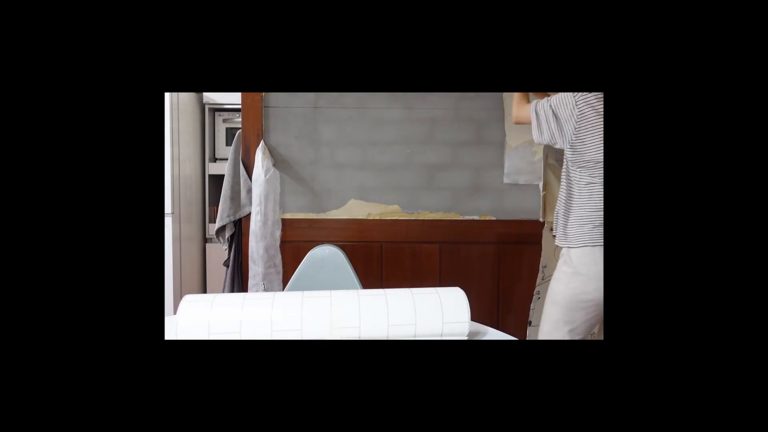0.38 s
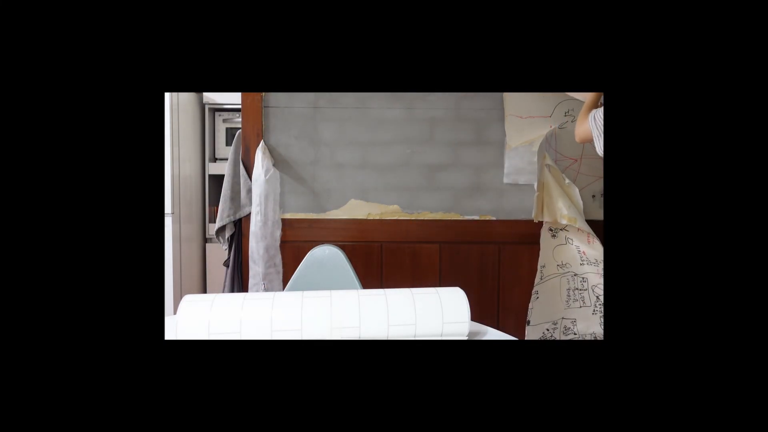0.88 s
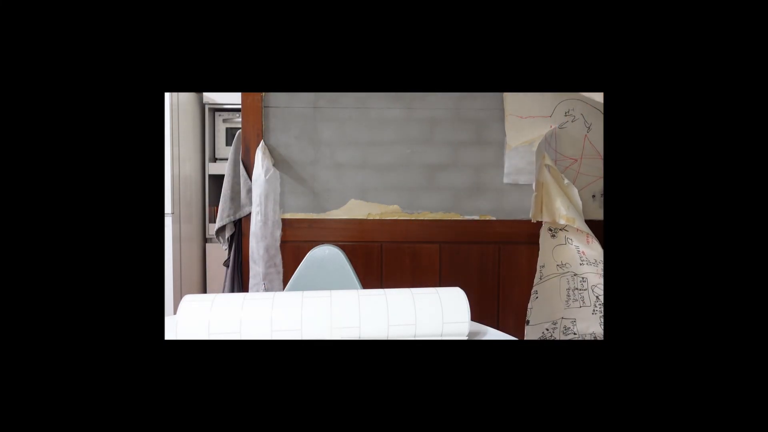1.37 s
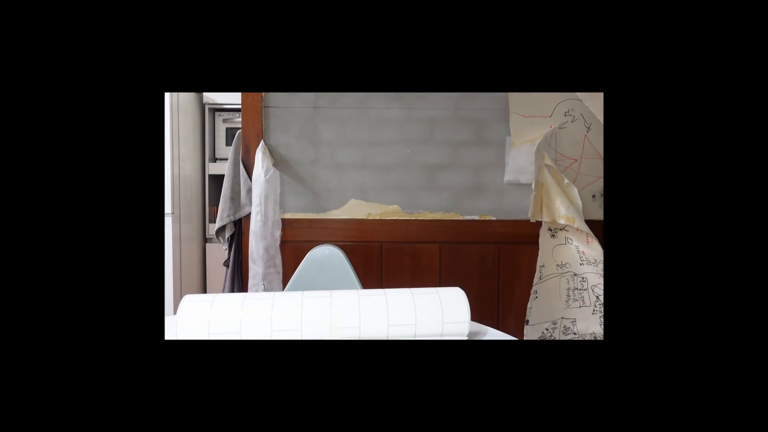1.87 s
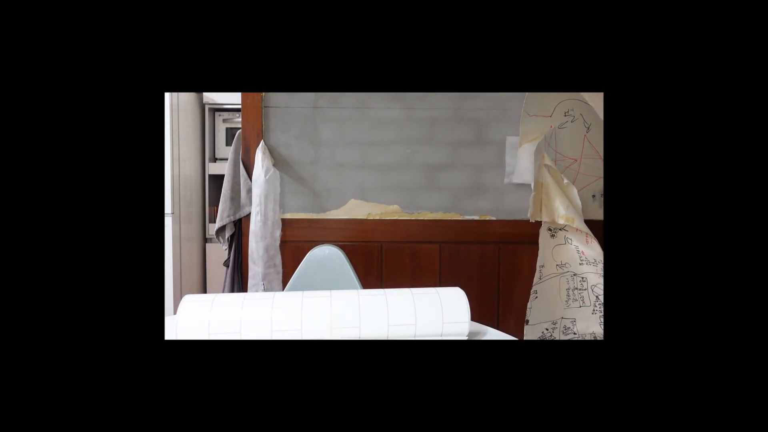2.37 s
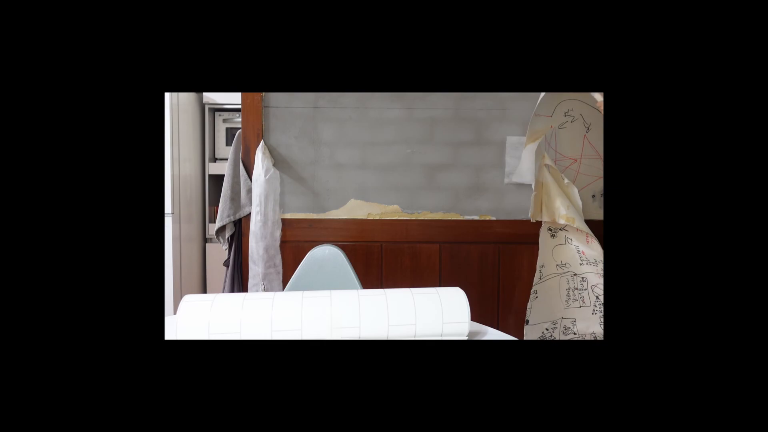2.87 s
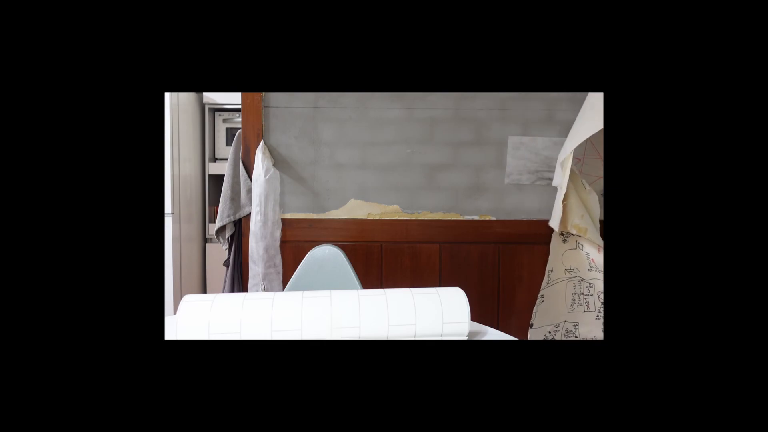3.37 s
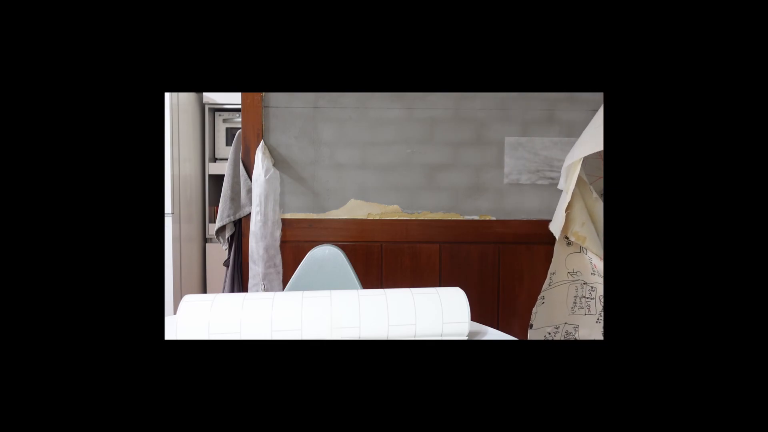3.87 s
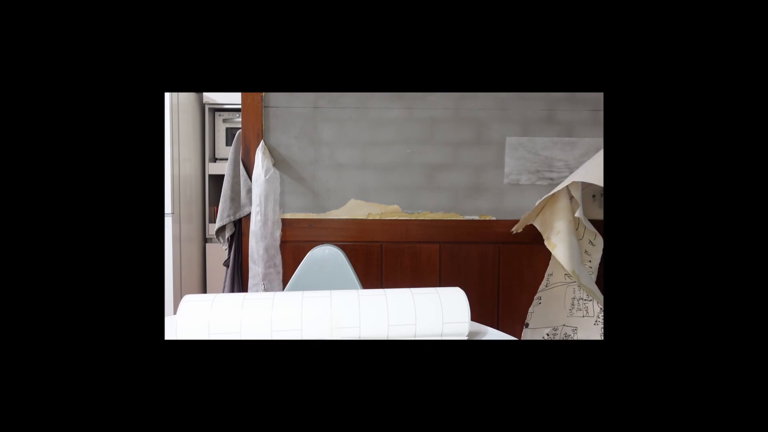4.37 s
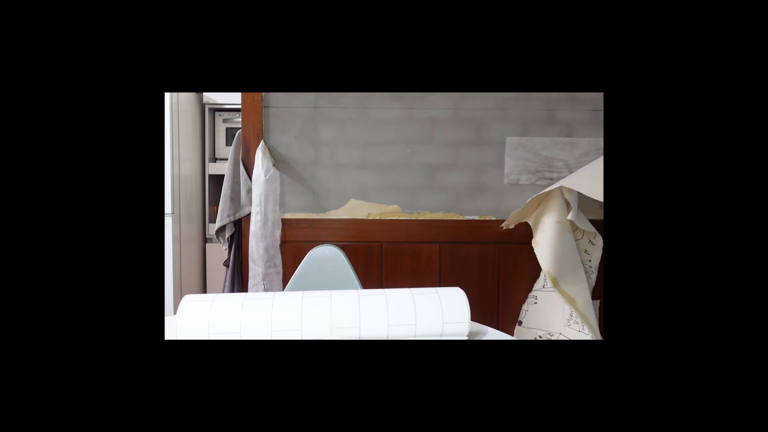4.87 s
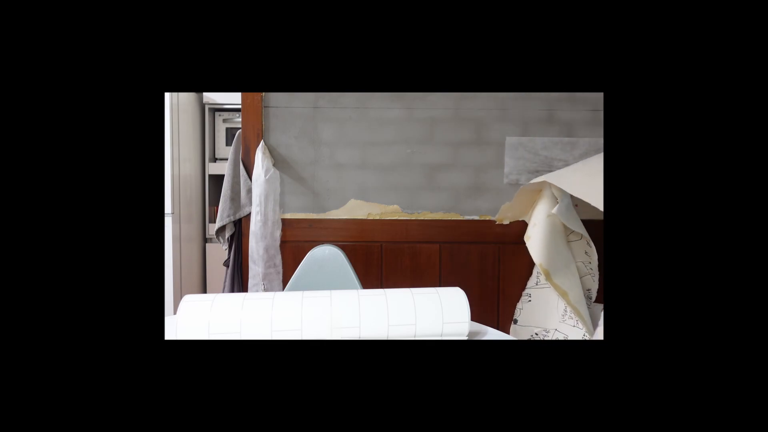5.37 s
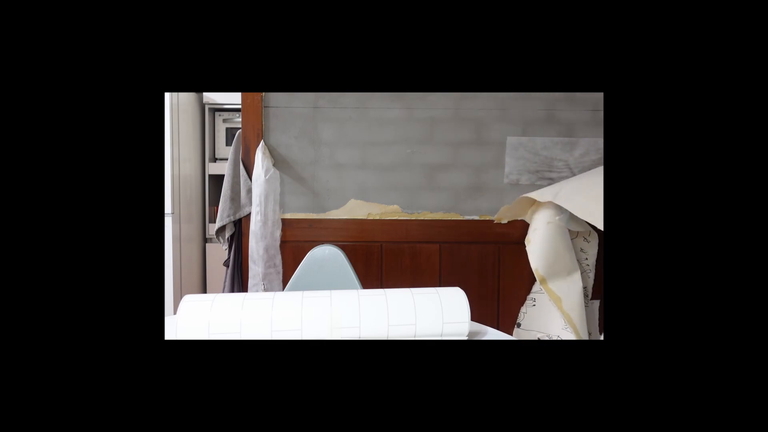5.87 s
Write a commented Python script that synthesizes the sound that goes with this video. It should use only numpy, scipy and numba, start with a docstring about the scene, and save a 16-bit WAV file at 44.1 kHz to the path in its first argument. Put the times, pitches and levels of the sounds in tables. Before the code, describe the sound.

Large sheets of old wallpaper come off a wall in a small furnished room, heard through a phone-like microphone with thin bass, a short room tail and faint steady hiss. From 0 to 1.4 s, overlapping pulls swell and fade several times a second: grainy mid-range crackle, fibrous hiss and sharp dry crease snaps. Around 1.5 s a sudden jerk and brief edge scrapes join in. From 2 s the sheet hangs looser, adding a low papery flop; it drops back near 2.4-2.6 s with small snaps. From 2.9 to 4.7 s strong pulls return, fuller, duller and less hissy, with flapping. Around 4.9-5.3 s only weaker short jerks remain, then one more clear rustle at 5.4 s and small snaps to 5.65 s. It quiets, and just after 6 s a soft, multi-bump thud sounds on the floor.

```python
"""Large sheets of old wallpaper are pulled off a wall and dragged aside in a small furnished room.
From the start, pulls swell and fade: a dense hail of tiny slips rings the paper, fibres hiss, creases snap.
From about 1.5 s some pulls start as sudden jerks and edges scrape, as short noises around one pitch.
From about 2 s more of the sheet hangs loose, and the same pulls drive a stronger low flop.
Near 6 s a row of soft pushes rings the floor as a thud; a faint room hiss runs throughout."""
import sys
import numpy as np
from scipy import signal
from scipy.fft import rfft, irfft, next_fast_len
from scipy.io import wavfile
from scipy.ndimage import uniform_filter1d
from numba import njit

SR = 44100
rng = np.random.default_rng(int(sys.argv[2]) if len(sys.argv) > 2 else 0)


def undo_db(level):
    """Turn decibels back into plain size, where 20 dB means ten times bigger."""
    steps = np.asarray(level, float) / 20
    return 10 ** steps


def persist_wave(psi):
    """Save psi, clipped to +-1, as 16-bit WAV."""
    counts = np.round(np.clip(psi, -1, 1) * 32767).astype(np.int16)
    wavfile.write(sys.argv[1], SR, np.atleast_2d(counts).T)


N = 275171
T = np.arange(N) / SR  # time [s]

# pulls that swell and fade: (full strength from [s], held [s], peel gain [dB],
# fibre hiss above peel [dB], top treble above fibre hiss [dB])
SWELLING_PULLS = [(-0.02, 0.019, -39, -6, -4), (.12, 0.087, -43, -4.5, -6), (.31, 0.076, -42.5, -1, -7),
                  (.48, 0.063, -43.5, -2, -10), (.845, 0.0097, -46, -6, -4), (.95, 0.1, -42, -1.5, -5),
                  (1.18, 0.0084, -41.5, -4.5, -4), (1.40, 0.078, -48, -2, -5.5),
                  (1.78, 0.036, -47, -2.5, -8.5), (1.86, 0.011, -47, -9, -10),
                  (1.95, 0.098, -43, -5.5, -4.5), (2.11, 0.26, -45.5, -3, -15.5), (2.38, 0.01, -68, 1, -5),
                  (2.68, 0.13, -46, -3.5, -11), (2.87, 0.013, -51.5, -5, -9), (2.97, 0.09, -42.5, -4, -11),
                  (3.14, 0.088, -40, -9.5, 1.5), (3.28, 0.033, -41, -9.5, -9),
                  (3.52, 0.023, -43.5, -8.5, -3.5), (3.76, 0.0056, -45.5, -9.5, -0.5),
                  (3.89, 0.037, -42, -7, -6), (4.0, 0.076, -39, -7.5, -5.5), (4.16, 0.072, -41, -8, -5.5),
                  (4.32, 0.073, -45.5, -13.5, -7), (4.48, 0.043, -45, -11, 10), (4.66, 0.03, -40, -6, -7),
                  (5.39, 0.12, -42, -4.5, -4), (5.72, 0.025, -62.5, -14, -4), (5.86, 0.065, -70, 2.5, -23),
                  (6.04, 0.023, -69, -0.5, -12)]
# pulls that swell and stop short: same columns
HALTED_PULLS = [(.62, 0.17, -44.5, -0.5, -6), (1.26, 0.075, -41, -1.5, -6.5), (1.56, 0.18, -43, 0, -12.5)]
# jerks that start almost at once: same columns
SUDDEN_JERKS = [(1.47, 0.026, -42.5, 0, -7), (2.522, 0.18, -53.5, -2, -10), (3.673, 0.06, -45, -12, 0),
                (4.6, 0.13, -46, -10, -13), (4.875, 0.031, -57, -8, -17), (5.012, 0.014, -50, -24, -8),
                (5.04, 0.018, -47.5, -17, -23), (5.225, 0.022, -77, 8, 3), (5.25, 0.0073, -53.5, 3, -9),
                (5.275, 0.048, -47.5, -7, -20), (5.638, 0.016, -48, -11, 4)]
# speed of rise and fade close to full strength
SWELL_DB_PER_S, JERK_DB_PER_S = 61, 2500
FADE_DB_PER_S, HALT_DB_PER_S, JERK_FADE_DB_PER_S = 75, 297, 175
STEEPEN_S = 0.13  # this far from full strength, the drop in dB is twice that of a steady slope

# tone colour of the peeling sheet: (frequency [Hz], gain [dB])
PEEL_COLOUR = [(200, -25), (500, 2), (800, 4.5), (1200, 1.5), (1700, 1), (2500, -4.5), (3500, -13),
               (5000, -26.5), (9000, -75)]
# tone colour of the fibre hiss: (frequency [Hz], gain [dB])
FIBRE_COLOUR = [(500, -83), (2200, -4), (3800, -1), (6500, -4.5), (9000, -12.5), (12000, -19.5),
                (15500, -15.5)]
# tone colour of its top treble: (frequency [Hz], gain [dB])
FIBRE_TREBLE_COLOUR = [(1000, -85), (6000, -6), (9000, -2), (12000, -2.5), (15500, -10.5)]
# tone colour of the heavy sheet flopping: (frequency [Hz], gain [dB])
FLOP_COLOUR = [(40, -42), (75, 0.5), (105, -34), (140, -15), (250, 2), (400, 3), (600, -3), (1500, -23.5)]
# how much of the sheet hangs loose: (time [s], share [0-1])
LOOSE_SHARE = [(0, 0.08), (1.7, 0), (2.3, 0.65), (3.0, 0.63), (3.25, 0.47), (3.7, 0.76), (4.3, 0.89),
               (4.7, 0.68), (5.0, 0.57), (5.15, 1), (5.3, 0.94), (6.24, 0.7)]
# a tight and a fully loose flap: pitch below which it gives little sound, flop gain beside the peel
TIGHT_EDGE_HZ, LOOSE_EDGE_HZ = 560, 454
TIGHT_FLOP_DB, LOOSE_FLOP_DB = -26, -9.5
# air pocket behind the flap: (time [s], resonance [Hz], gain beside the peel [dB])
AIR_POCKET = [(0, 855, -5.5), (.25, 790, -12), (.58, 850, -17), (.7, 800, -17), (1.1, 913, -14),
              (1.3, 930, -13), (1.5, 860, -14), (1.6, 760, -5), (1.78, 740, -12), (1.86, 730, 2.5),
              (2.0, 780, -5.5), (2.15, 720, -6), (2.3, 640, -14), (2.65, 668, -5), (2.95, 586, -6),
              (3.2, 1390, -47), (4.2, 900, -29), (4.65, 566, -13), (5.5, 574, -52), (6.24, 704, -27)]
# the free flap's own broad ring: (time [s], centre [Hz], width [Hz], gain beside the peel [dB])
FLAP_RING = [(0, 1900, 220, -14), (.3, 1680, 220, -9), (.65, 1620, 220, -9.5), (1.15, 1600, 200, -6),
             (1.6, 1670, 220, -10), (2.0, 1520, 250, -4), (2.3, 1660, 250, -8.5), (2.9, 1430, 400, -19),
             (3.08, 2650, 1400, -8), (3.2, 2630, 1400, 1), (3.35, 2400, 1400, -12.5),
             (4.15, 1230, 300, -7.5), (4.4, 1210, 250, -13), (4.7, 1900, 300, -15),
             (5.05, 1160, 250, -10.5), (5.45, 1700, 250, -8), (6.24, 1500, 300, -29)]

# creases that snap: (time [s], peak before room and microphone [dB], extra brightness [dB])
CREASE_SNAPS = [(0.0317, -25, -2), (0.635, -29, -12), (0.742, -29, 4), (0.795, -25, -10), (0.955, -34, 19),
                (1.1056, -23, 3), (1.204, -26.5, -16), (1.24, -26.5, 12), (1.3374, -32, 20),
                (2.1295, -26.5, -1), (2.165, -28, 6), (2.252, -25.5, -6), (2.5195, -37.5, 12),
                (2.552, -38, 8), (2.575, -31.5, -2.5), (2.6172, -29, 6), (2.8085, -28.5, -8),
                (2.9274, -29, 3), (2.953, -25, -3), (3.674, -33.5, 9), (3.7334, -33, -3), (4.454, -31, 41),
                (4.8919, -44, -21), (5.1552, -39.5, -23), (5.2676, -24.5, -13), (5.366, -25.5, -25),
                (5.534, -28.5, -2), (5.628, -31.5, 9), (5.630, -26, 3)]
# scraping edges: (time [s], fading time [s], centre [Hz], width [Hz], gain [dB])
EDGE_SCRAPES = [(1.484, 0.02, 4500, 150, -46), (1.72, 0.045, 3820, 150, -48), (1.726, .03, 4500, 200, -46),
                (1.855, 0.018, 5600, 900, -40.5), (4.995, 0.051, 2230, 300, -58),
                (5.53, 0.033, 7100, 200, -46.5), (5.636, 0.11, 5660, 2390, -53.5)]
# bumps of the soft thud on the floor: (time [s], push gain [dB])
THUD_PUSHES = [(6.025, -24), (6.040, -24), (6.051, -24), (6.072, -22.5), (6.086, -34), (6.094, -32),
               (6.112, -32), (6.139, -40), (6.17, -45)]
# what the thud rings in the floor: (centre [Hz], width [Hz], gain [dB])
FLOOR_RINGS = [(233, 35, 13), (330, 40, 14), (520, 89, 6), (800, 160, 9)]

# low resonances of the room: (centre [Hz], width [Hz], gain [dB])
ROOM_RINGS = [(147.4, 7.8, 9.5), (171, 18.5, 9.5), (221.6, 7.5, 4), (277, 42, 2), (333, 29, -1),
              (604, 168, 9.5)]
# two fades mixed to make the tail, each given as its time to fall by 60 dB
SLOW_T60_S, FAST_T60_S = 0.37, 0.36
ROOM_DB = -6.5  # gain of the tail in the middle
ECHO_S, ECHO_DB = .012, -18  # echoes off the nearby wall and furniture: spread of delays, gain
PLACES = 10  # spots along the wall, each with its own echoes and tail
# tone colour of the room hiss: (frequency [Hz], gain [dB])
HISS_COLOUR = [(25, 5), (60, 8), (120, 8), (180, 5), (520, 5), (900, 2), (2600, 3.5), (6800, -6),
               (9000, -10), (15500, -19)]
HISS_DB, HISS_SIDE_DB = -65, 5.5  # before the microphone; boost of the side before its filter

# filter for the side, the part that differs between left and right: (frequency [Hz], gain [dB])
SIDE_COLOUR = [(60, -20), (110, -26), (200, -27), (380, -22.5), (700, -18), (1290, -18), (2380, -16.5),
               (4400, -12.5), (8120, -11.5), (15000, -13.5)]
# lean of the middle at each pitch: (frequency [Hz], left minus right [dB])
TONE_LEAN = [(200, -1.5), (1500, -1.5), (4000, -1.9), (8000, -1.7)]
# lean of the middle over time: (time [s], left minus right [dB])
LEAN_OVER_TIME = [(0, 2), (1, 0.6), (2.5, 1.24), (5.5, 0.6), (6.24, 2.5)]
# the microphone's weak bass, and a steep filter near 15.8 kHz: (frequency [Hz], gain [dB])
PHONE_COLOUR = [(20, -21), (60, -19.5), (110, -8.5), (140, -2.5), (15700, -5), (15900, -54)]


def paper():
    """One hail of slips rings the sheet and makes its fibres hiss; a second, sparser one makes it flop."""
    power = (tugs(SWELLING_PULLS, SWELL_DB_PER_S, FADE_DB_PER_S)
             + tugs(HALTED_PULLS, SWELL_DB_PER_S, HALT_DB_PER_S)
             + tugs(SUDDEN_JERKS, JERK_DB_PER_S, JERK_FADE_DB_PER_S))
    peel_gain, fibre_gain, treble_gain = np.sqrt(power)
    loose, = over_time(LOOSE_SHARE)
    hail = slips(per_s=9000., spread_db=3.0, flutter_db=1.0)
    sheet = hail + undo_db(-9) * unit(sheet_modes(hail))
    peeling = peel_gain * peel(hail, sheet, loose)
    return peeling + fibres(sheet, fibre_gain, treble_gain), peel_gain * flop(loose)


def tugs(rows, rise_db_per_s, fade_db_per_s):
    """Power of peel, fibre hiss and top treble: each tug rises, holds and fades, steeper further out."""
    power = 0
    for start, hold, peel_db, fibre_db, treble_db in rows:
        before = np.maximum(start - T, 0)
        after = np.maximum(T - start - hold, 0)
        loss_db = rise_db_per_s * before + fade_db_per_s * after
        loss_db = loss_db * (1 + (before + after) / STEEPEN_S)
        layers = undo_db(np.cumsum([0, fibre_db, treble_db]))[:, None]
        power = power + (undo_db(peel_db - loss_db) * layers) ** 2
    return power


def slips(per_s, spread_db, flutter_db):
    """Glue and fibres let go in one-sample slips of random size and sign, whose level flutters."""
    when, sign, tail = rng.random((3, N))
    size_db = np.minimum(-spread_db * np.log(1 - tail), 12)  # most small, a few up to 12 dB larger
    hail = (when < per_s / SR) * np.sign(sign - .5) * undo_db(size_db)
    flutter = 0.1 * walk(15.0) + 0.66 * walk(50.)
    return unit(hail * undo_db(flutter_db * flutter))


def sheet_modes(hail):
    """Bending keeps changing how loudly each mode of the sheet rings; its pitch drifts only about 1 %."""
    total = 0
    for hz in np.geomspace(900, 9000, num=24):
        mode = band(hail, hz * (1 + .01 * walk(2.)), .05 * hz)
        total = total + undo_db(3.5 * walk(30.)) * mode / hz ** .5
    return total


def peel(hail, sheet, loose):
    """The sheet, the air pocket and the flap together; a small loose flap cannot push bass into the air."""
    mix = unit(colour(sheet, PEEL_COLOUR)) + air_pocket(hail) + flap_ring(hail)
    edge_hz = TIGHT_EDGE_HZ + loose * (LOOSE_EDGE_HZ - TIGHT_EDGE_HZ)
    for _ in range(2):  # two rounds cut the bass more steeply
        mix = ring(mix, edge_hz, 1.162 * edge_hz, 0.89)
    return mix


def air_pocket(hail):
    """Slips ring the air trapped behind the flap, with a slightly unsteady pitch and level."""
    hz, db = over_time(AIR_POCKET)
    narrow = band(hail, hz * (1 + .005 * walk(12.)), 105.)
    return undo_db(db) * undo_db(2.5 * walk(18.)) * unit(band(narrow, hz, 300.))


def flap_ring(hail):
    """Slips set off the free flap's own broad resonance."""
    hz, width, db = over_time(FLAP_RING)
    # dividing keeps narrow and wide rings about equally loud
    return undo_db(db) * band(hail, hz, width) / np.sqrt(np.pi * width / SR)


def fibres(sheet, fibre_gain, treble_gain):
    """Tearing fibres: the sheet's treble in two layers, each with its own flicker."""
    hiss = undo_db(0.74 * walk(20.0)) * unit(colour(sheet, FIBRE_COLOUR))
    treble = undo_db(3.2 * walk(20.)) * unit(colour(sheet, FIBRE_TREBLE_COLOUR))
    return fibre_gain * hiss + treble_gain * treble


def flop(loose):
    """The heavy sheet flops low, more strongly the more of it hangs loose."""
    flop_db = TIGHT_FLOP_DB + loose * (LOOSE_FLOP_DB - TIGHT_FLOP_DB)
    hail = slips(per_s=1200.0, spread_db=0.0, flutter_db=1.0)
    return undo_db(flop_db) * unit(colour(hail, FLOP_COLOUR))


def snaps():
    """Each crease gives a few-millisecond crack, then a short rattle."""
    size = 4096
    out, t = np.zeros(N + size), np.arange(size) / SR
    fade = np.exp(-t / 0.0013) + 0.18 * np.exp(-t / 0.07)  # crack + rattle
    noises = rng.standard_normal((len(CREASE_SNAPS), size))
    for (s, db, bright_db), noise in zip(CREASE_SNAPS, noises):
        crack = colour(noise * fade, [(60, -58), (300, -2), (900, 9.0), (2500, 8.0),
                                      (7000, 7.0 + bright_db), (14000, -15.5 + bright_db)])
        start = int(s * SR)
        out[start:start + size] += undo_db(db) * crack / np.abs(crack).max()
    return out[:N]


def scrapes():
    """An edge scrapes: noise around one pitch rises fast and dies away."""
    out, size = np.zeros(N), 8192
    t = np.arange(size) / SR
    noises = rng.standard_normal((len(EDGE_SCRAPES), size))
    for (s, length, hz, width, db), noise in zip(EDGE_SCRAPES, noises):
        tone = unit(ring(noise, np.full(size, 1. * hz), np.full(size, 1. * width), 0.))
        swell = np.minimum(t / 0.0046, 1) * np.exp(-(t / length) ** 2)
        start = int(s * SR)
        out[start:start + size] += undo_db(db) * tone * swell
    return out


def thud():
    """Soft pushes about two milliseconds long ring the floor."""
    hits, push = np.zeros(N), np.hanning(int(0.00224 * SR))
    for s, db in THUD_PUSHES:
        hits[int(s * SR)] = undo_db(db)
    pushes = -np.convolve(hits, np.diff(push))[:N]  # the changing slope of each push
    return sum(undo_db(db) * band(pushes, hz, width) for hz, width, db in FLOOR_RINGS)


def low_room(x):
    """Low sounds ring the standing waves of the room."""
    return undo_db(-3.0) * x + sum(undo_db(db) * band(x, hz, width) for hz, width, db in ROOM_RINGS)


def room(x):
    """Direct sound, close echoes and tails that change as the sheet moves along the wall."""
    t = np.arange(SR // 2) / SR
    noise = rng.standard_normal((PLACES, 2, len(t))) * (t > .003)
    # the slow part has boosted treble and the rest takes it back, so the treble lingers a little
    slow = colour(noise, [(1500, 1.1), (5000, 12.0)])
    tail = slow * undo_db(-60 * t / SLOW_T60_S) + (noise - slow) * undo_db(-60 * t / FAST_T60_S)
    tail = tail / np.linalg.norm(tail, axis=2, keepdims=True)
    # four echoes at each place, in the middle only
    lag, sign = rng.random((2, PLACES, 4))
    delay = (lag * ECHO_S * SR).astype(int) + 20
    tail[np.arange(PLACES)[:, None], 0, delay] += np.sign(sign - .5) * undo_db(ECHO_DB - ROOM_DB)
    # fade smoothly from each place to the next
    place = T / T[-1] * (PLACES - 1)
    share = [np.cos(np.pi / 2 * np.clip(place - k, -1, 1)) for k in range(PLACES)]
    mid, side = sum(signal.oaconvolve((x * w)[None], h, axes=1)[:, :N] for w, h in zip(share, tail))
    return x + undo_db(ROOM_DB) * mid, side


def room_hiss():
    """Faint steady noise from all round: separate noise in middle and side, the side raised before its filter."""
    mid, side = undo_db(HISS_DB) * unit(colour(rng.standard_normal((2, N)), HISS_COLOUR))
    return mid, undo_db(HISS_SIDE_DB) * side


def unit(x):
    """Scale to an average (rms) level of 1."""
    return x / np.sqrt(np.mean(x ** 2))


def over_time(table):
    """Join the points of each column after the time by straight lines."""
    s, *columns = np.transpose(table)
    return [np.interp(T, s, c) for c in columns]


def walk(rate):
    """Random levels held 1 / rate seconds, smoothed twice, scaled to rms 1."""
    k = int(SR / rate)
    steps = np.repeat(rng.standard_normal(N // 200)[:N // k + 1], k)[:N]
    return unit(uniform_filter1d(uniform_filter1d(steps, k), k))


def colour(x, points, scale=1):
    """Filter by (frequency [Hz], gain [dB]) points joined on a log-frequency axis."""
    size = next_fast_len(x.shape[-1] + 4096)
    hz, db = np.transpose(points)
    f = np.arange(size // 2 + 1) * SR / size + 1
    gain = undo_db(scale * np.interp(np.log(f), np.log(hz), db))
    return irfft(rfft(x, size) * gain, size)[..., :x.shape[-1]]


def band(x, hz, width):
    """Resonance that leaves its own centre pitch at gain 1."""
    return ring(x, hz * np.ones(N), width * np.ones(N), 0.)


@njit
def ring(x, hz, width, high):
    """Moving resonant filter: band-pass when high is 0, high-pass when 1, a blend in between."""
    y, b, l = np.empty(len(x)), 0., 0.
    for i in range(len(x)):
        g, k = np.tan(np.pi * hz[i] / SR), width[i] / hz[i]
        v = (b + g * (x[i] - l)) / (1 + g * (g + k))
        low = l + g * v
        b, l = 2 * v - b, 2 * low - l
        y[i] = high * (x[i] - k * v - low) + (1 - high) * k * v
    return y


def scene():
    """Paper, snaps, scrapes and thud in the room, over the hiss, as left and right."""
    sheet, low_flop = paper()
    mid, side = room(sheet + snaps() + scrapes() + thud() + low_room(low_flop))
    hiss_mid, hiss_side = room_hiss()
    mid = mid + hiss_mid
    side = colour(side + hiss_side, SIDE_COLOUR)
    lean_db, = over_time(LEAN_OVER_TIME)
    pan = undo_db(lean_db / 2)
    left = pan * colour(mid, TONE_LEAN, .5) + side
    right = colour(mid, TONE_LEAN, -.5) / pan - side
    return np.array([left, right])


def top_cut(x):
    """Nothing passes above the cut-off."""
    return signal.sosfilt(signal.butter(12, 15860, fs=SR, output="sos"), x)


def record(dry):
    """The phone's microphone drops the bass; a steep filter near 15.8 kHz removes the very top."""
    mix = colour(dry, PHONE_COLOUR)
    return top_cut(mix)


dry = scene()
out = record(dry)
persist_wave(out)
```